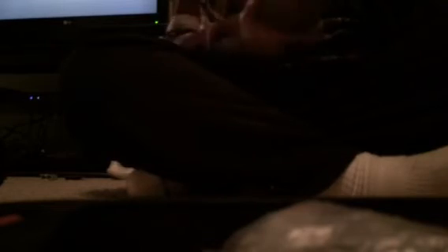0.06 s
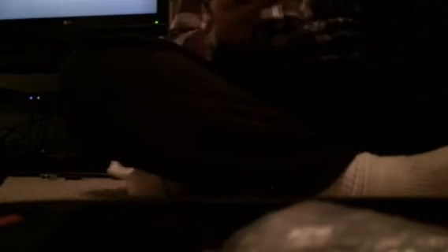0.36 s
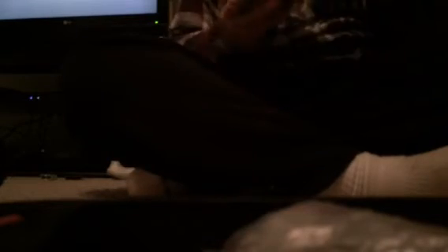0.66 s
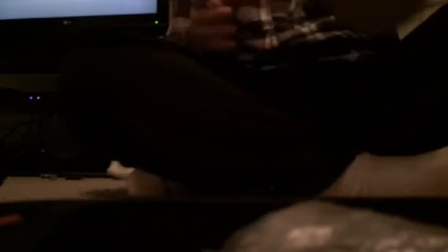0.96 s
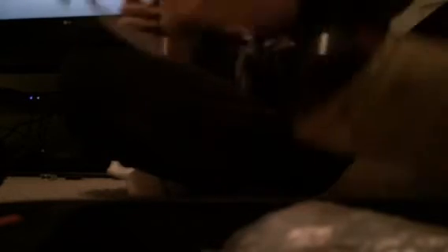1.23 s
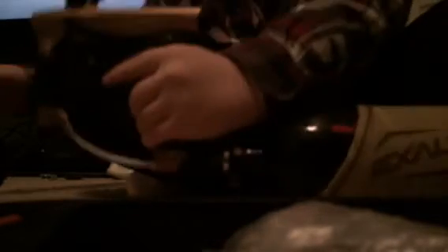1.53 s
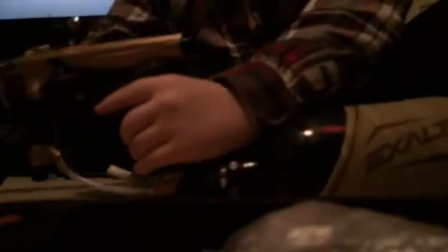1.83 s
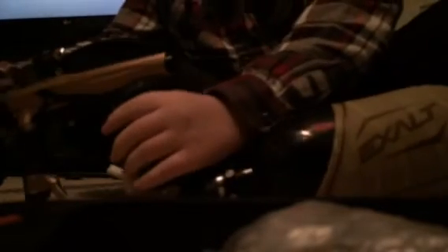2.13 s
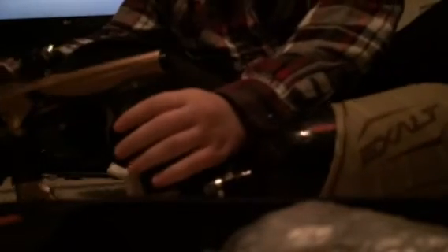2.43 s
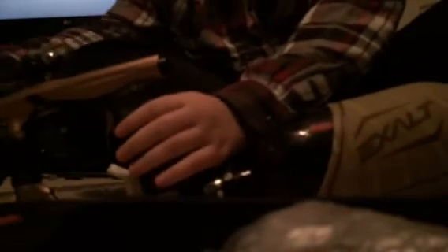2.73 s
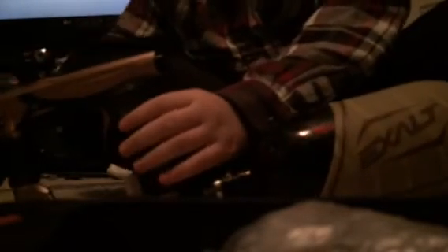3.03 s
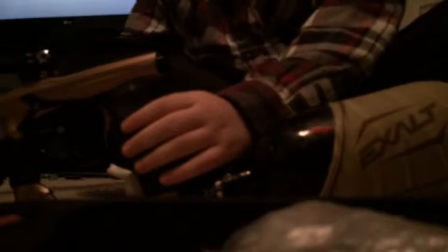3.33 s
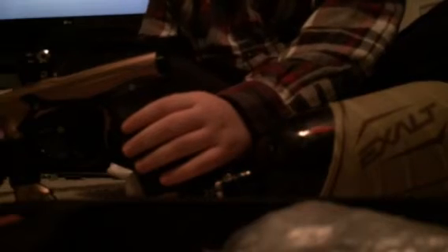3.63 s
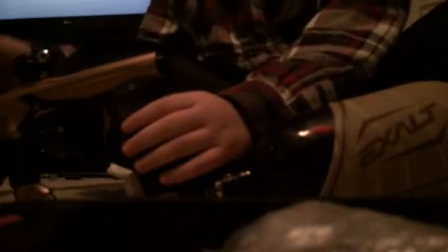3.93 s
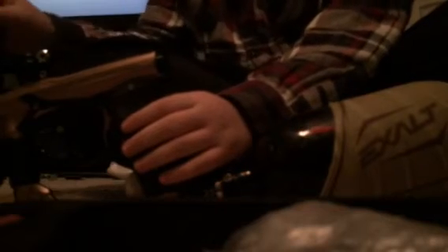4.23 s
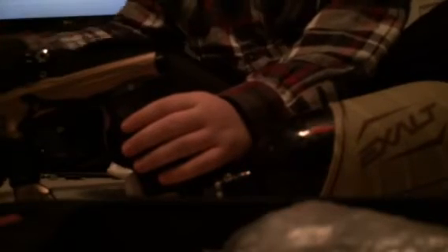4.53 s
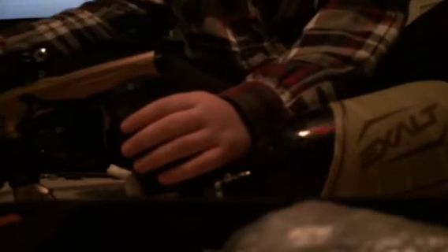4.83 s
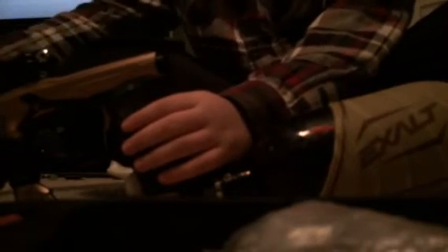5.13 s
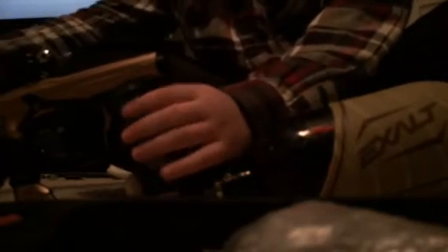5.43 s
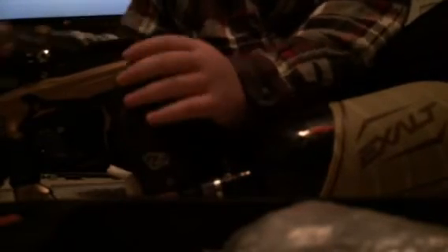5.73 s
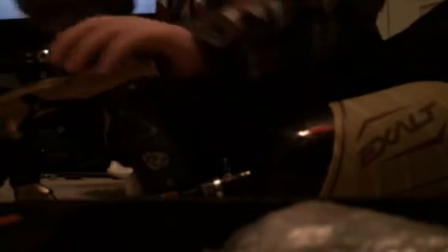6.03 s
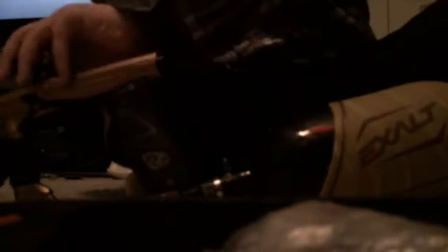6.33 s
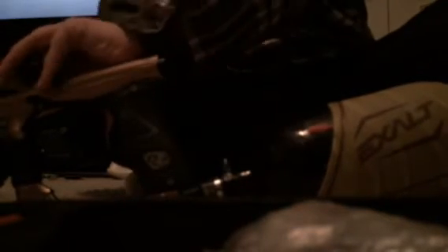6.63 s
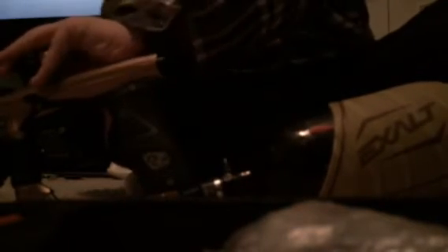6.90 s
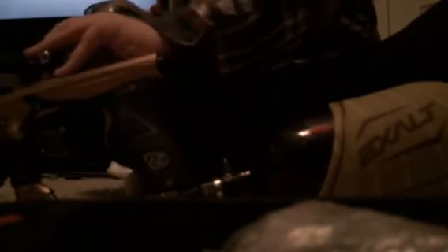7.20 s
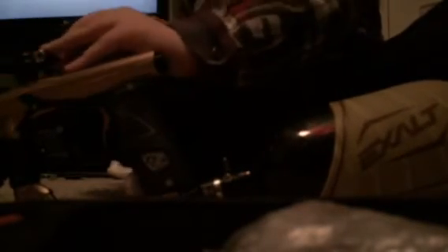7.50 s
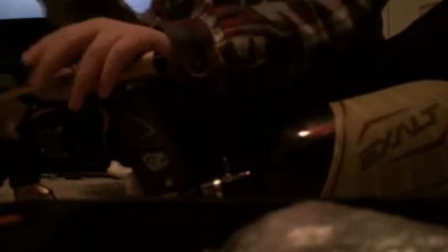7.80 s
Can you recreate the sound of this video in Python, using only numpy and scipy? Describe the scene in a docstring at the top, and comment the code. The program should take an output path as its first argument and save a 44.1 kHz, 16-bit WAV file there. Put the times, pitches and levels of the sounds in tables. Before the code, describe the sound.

In a small room with a faint, steady rumble and hiss, someone handles a paintball marker and tank near the microphone. Sharp little clicks and brushing cloth come first, then light knocks and sliding on a tabletop. One loud knock leads into a short spell of clattering, scraping and clanking metal, before things settle to soft thumps, clicks and light finger rubbing.

```python
"""A paintball marker with its air tank is handled on a table in a small room, over a faint rumble and hiss.
First, sleeves rustle and small fittings click as their hard parts snap together. From 1.7 s the marker
knocks on the table and scrapes as it is pushed, while fingers rub its shell and hands thump it softly.
At 4.4 s it is stood down with the loudest knock, then clatters as it is shifted; metal clanks near 4.9
and 5.3 s. After 6 s only soft thumps, a few clicks and light rubbing are left."""
import sys
import numpy as np
from scipy import signal
from scipy.fft import rfft, irfft
from scipy.io import wavfile

SR = 44100
rng = np.random.default_rng(int(sys.argv[2]) if len(sys.argv) > 2 else 0)


def persist_wave(psi):
    """Save psi, clipped to +-1, as 16-bit WAV."""
    counts = np.round(np.clip(psi, -1, 1) * 32767).astype(np.int16)
    wavfile.write(sys.argv[1], SR, np.atleast_2d(counts).T)


N = 355446
TIME = np.arange(N) / SR  # seconds into the scene
AGE = TIME[:SR // 2]  # seconds into one short sound

# Levels are relative. A t60 is the time to fade by 60 dB; a mode is one tone a thing rings at.
# tone colour of each sound, from bass to treble: f/Hz, level/dB
BACKGROUND_COLOUR = [(20, -21), (40, -9.5), (65, 0.5), (120, 3.5), (200, -5.5), (400, -11), (800, -18),
                     (1600, -21.5), (2600, -28), (6000, -29.5), (12000, -31.5), (16000, -34.5)]
SLEEVE_COLOUR = [(300, -15), (1200, 1), (2000, -13.5), (3000, -5), (5000, -7), (7000, -0.5), (10500, 0),
                 (15000, -2.5)]
SHELL_COLOUR = [(200, -26), (600, 1), (1000, 1.5), (1400, -1.5), (1900, -3), (2500, -13.5), (4500, -21),
                (9000, -36), (16000, -51)]
SLIDE_COLOUR = [(70, -16), (120, -1), (240, -6), (350, -4.5), (520, -5.5), (750, -6.5), (1000, -13),
                (1350, -13.5), (1900, -24), (2600, -27.5), (5000, -30.5), (15000, -53)]
SCRAPE_COLOUR = [(500, -10), (1500, 0), (2500, 2.5), (4000, 0), (5800, 0), (8000, -7), (11000, -11),
                 (15000, -11)]
TICK_COLOUR = [(500, -26.5), (2200, -19), (3500, -1.5), (6500, 1.5), (9000, -1.5), (15000, -4.5)]
HOLLOW_COLOUR = [(150, -22.5), (450, -5), (900, -4.5), (1500, 0.5), (2300, -13.5), (4000, -27),
                 (16000, -45)]
METAL_COLOUR = [(800, -8), (1500, 2), (2450, -3), (2800, -5.5), (3600, -3.5), (4500, -2), (4850, -8),
                (5300, -3), (5700, -22), (6800, -14), (15000, -25)]
# how long the room rings: f/Hz, t60/s
ROOM_T60 = [(100, 0.282), (500, 0.29), (2000, 0.47), (6000, 0.2), (15000, 0.16)]
# how loudly the room rings: f/Hz, level/dB
ROOM_DB = [(100, -5), (250, -8.5), (500, -13.5), (2000, -7.5), (6000, -9), (15000, -20)]
# echoes from nearby walls: delay/s, level/dB
ECHOES = [(0.014, -13), (0.0183, -24), (.0265, -17.5)]
# sleeves brushing as the arms reach and change grip: t/s, level/dB, half-length/s
SWISHES = [(.21, -58, 0.16), (.555, -54.5, 0.047), (.85, -58, .04), (2.55, -57, 0.018),
           (3.47, -63.5, 0.057), (3.88, -62, 0.035), (4.17, -54.5, .06), (4.45, -60, 0.074),
           (4.67, -59, 0.037), (6.17, -67, 0.11), (6.62, -68, 0.058), (7.29, -71.5, 0.065)]
# fingers rubbing the shell: t/s, level/dB, half-length/s
RUBS = [(1.62, -60, 0.037), (2.90, -60, 0.041), (3.33, -58, 0.027), (4.11, -52.5, 0.12),
        (5.40, -52.5, 0.031), (5.505, -47, 0.047), (5.565, -39, 0.016), (6.70, -60, 0.019),
        (6.86, -56, 0.012), (7.12, -68.5, 0.063), (7.245, -57, 0.023)]
# pushes that drag the marker over the table: t/s, level/dB, half-length/s, edge scrape/dB
DRAGS = [(1.926, -51.5, 0.036, -17.5), (2.162, -57.5, 0.2, -21), (2.413, -56.5, 0.052, -12.5),
         (3.331, -54.5, 0.096, -36), (3.637, -63.5, 0.14, -36), (3.818, -55, 0.081, -27),
         (4.101, -48, 0.14, -17.5), (4.382, -50.5, 0.059, -13), (4.798, -48.5, 0.079, -19),
         (4.898, -40.5, 0.041, -20), (5.048, -50.5, 0.065, -40), (5.154, -43, 0.043, -12),
         (5.28, -43.5, 0.048, -16), (5.46, -52.5, 0.14, -29), (5.56, -38.5, .025, -16),
         (5.684, -52.5, .1, -2.5)]
# small fittings clicking: t/s, level/dB, brightest f/Hz, hollow shell/dB, t60/s
CLICKS = [(0.1126, -37, 5850, -10, 0.03), (0.33, -47.5, 5800, -12, 0.02), (0.4, -47.5, 6100, -12, 0.023),
          (.5175, -33.5, 5960, -12.5, 0.033), (0.5211, -31.5, 7300, -15, 0.054),
          (1.0688, -39.5, 5450, -15, 0.013), (1.0936, -34.5, 10000, -16, 0.011),
          (1.4128, -36.5, 7500, -5, 0.013), (1.426, -39, 8000, -6, 0.011), (1.435, -38, 3140, -12, 0.037),
          (4.4302, -34.5, 6000, -6, 0.018), (6.3288, -50, 3080, -7, 0.018), (6.3764, -47, 3360, -14, 0.016),
          (6.6878, -44, 5750, -9, 0.013), (6.701, -33, 5860, -10.5, 0.016),
          (6.806, -33, 3040, -14.5, 0.0078), (6.8749, -32.5, 13500, -15.5, 0.011),
          (6.8785, -33, 9600, -23, 0.0096)]
# modes shared by the fittings: f/Hz, level/dB, t60/s
FITTING_MODES = [(3120, 4.5, 0.01536), (5340, -8.5, 0.0177), (5620, 1.5, 0.02), (8750, -2.5, 0.013),
                 (9520, 0.5, 0.011), (9300, -5.5, 0.023), (13600, 0.5, .012)]
# metal parts clanking: t/s, level/dB, boosted f/Hz, t60/s
CLANKS = [(4.873, -36, 2520, 0.075), (4.886, -42, 4600, 0.22), (5.27, -43.5, 3200, 0.095),
          (5.279, -59, 4080, 0.089)]
# hands thumping the marker: t/s, level/dB, f/Hz
THUMPS = [(1.9, -30.5, 121), (3.216, -35.5, 125), (4.424, -13, 171), (4.432, -25, 144), (5.584, -17.5, 197),
          (5.685, -20.5, 184), (5.706, -30, 162), (6.2766, -24.5, 191), (6.477, -31, 192)]
# tones that ring on after each knock, from the marker, table and room: f/Hz, level/dB, t60/s
AFTER_TONES = [(131.8, -8.5, 0.17), (223.4, -10, 0.073), (294, -12, 0.48), (449.6, -11.5, 0.16),
               (519, 0.5, 0.1), (573, -0.5, 0.14), (620.5, -5.5, 0.138), (676, 0.5, 0.098), (759, -6, 0.27),
               (925, -13, 0.3), (1040, -6, 0.18), (1100, -10, 0.14), (1183, -11, 0.18), (1507, -16, 0.16),
               (1998, -33, 0.12)]
# marker and tank knocking: t/s, level/dB, struck part's f/Hz, table thud/dB, hardness (0 to 1)
KNOCKS = [(1.662, -37, 530, -27, 1), (1.677, -41, 1130, -2.5, 0.86), (1.70, -46.5, 407, -11, 0.76),
          (1.896, -39.5, 530, -3.5, 0.04), (1.915, -44, 720, 0, 0.26), (2.067, -50, 784, -2, 0.15),
          (2.144, -41, 486, -8, 0.15), (2.269, -49, 543, 1, 0.36), (2.530, -31.5, 516, -19, 0.68),
          (3.212, -43, 523, .5, 0), (3.394, -48, 450, -3, 0.3), (3.769, -42.5, 730, -20, 0.5),
          (3.975, -27.5, 597, 0.5, 0.05), (3.989, -33, 660, -14, 0.34), (4.305, -46.5, 650, -4, 0.71),
          (4.376, -39.5, 694, -23.5, 0.95), (4.419, -8, 588, -3.5, 0.45), (4.428, -12, 548, -6.5, 0.68),
          (4.730, -35, 370, -11, 0.1), (4.799, -26, 672, -24, 0.34), (4.860, -29, 670, -16, 0.5),
          (4.868, -20.5, 685, -22, 0.07), (4.873, -20, 720, -21, 0.62), (4.884, -23, 666, -12, 0.4),
          (5.111, -33.5, 850, -14, 0.3), (5.131, -27.5, 635, -27, 0.84), (5.174, -40.5, 765, -24, 0.77),
          (5.223, -30, 550, 0, 0.55), (5.249, -24, 705, -15, 0.2), (5.255, -15, 680, -19, 0.35),
          (5.298, -30.5, 573, -22, 0.7), (5.505, -38.5, 980, -22, .5), (5.522, -29.5, 880, -4, 0.5),
          (5.529, -13, 587, -10, 0.35), (5.553, -41, 680, -5, 0.94), (5.635, -32, 664, 1.5, 1),
          (5.695, -32.5, 507, -16, 0.67), (5.743, -38.5, 490, -11, 0.93), (5.795, -32.5, 574, 1.5, 0.84)]


def undb(db):
    """Turn decibels into a gain to multiply by."""
    return 10 ** (np.asarray(db) / 20)


def unit(x):
    """Scale a signal to an average power of 1."""
    return x / np.sqrt(np.mean(x ** 2))


def lookup(points, hz):
    """Read between a table's rows, spacing the octaves evenly."""
    f, value = np.transpose(points)
    return np.interp(np.log(np.maximum(hz, 1)), np.log(f), value)


def colour(x, points):
    """Give a sound a tone colour; white noise keeps its power."""
    size = 4096
    gains = unit(undb(lookup(points, np.fft.rfftfreq(size, 1 / SR))))
    # fold the filter so that it never sounds ahead of its input
    cepstrum = irfft(np.log(gains))
    cepstrum[1:size // 2] *= 2
    cepstrum[size // 2 + 1:] = 0
    return signal.oaconvolve(x, irfft(np.exp(rfft(cepstrum))))[:len(x)]


def add(track, s, sound):
    """Mix a sound in at s seconds."""
    i = max(int(s * SR), 0)
    track[i:i + len(sound)] += sound[:N - i]


def fade(t60):
    """A gain that falls by 60 dB in t60 seconds."""
    return np.exp(-np.log(1000) * AGE / max(t60, .001))


def ring(hz, t60):
    """One struck mode: a fading tone."""
    return np.sin(2 * np.pi * hz * AGE) * fade(t60)


def resonate(x, hz, sharpness):
    """Keep the part of a sound near one pitch."""
    return signal.lfilter(*signal.iirpeak(hz, sharpness, fs=SR), x)


def burst(t60, contact_ms=0.38):
    """A contact's many fast-dying modes, as noise that swells while the rough faces meet."""
    return rng.standard_normal(len(AGE)) * fade(t60) * (1 - np.exp(-1000 * AGE / contact_ms))


def strokes(rows):
    """Each smooth hand movement swells and fades around its time."""
    return sum(undb(db) * np.exp(-((TIME - s) / half_length) ** 2) for s, db, half_length in rows)


def friction(grain_db, flutter_db):
    """Rubbing is many tiny slips of uneven size, coming in fits."""
    sizes = np.repeat(rng.standard_normal(N // 32 + 1), 32)[:N]
    fits = 1.2 * np.interp(TIME * 70, np.arange(4000), rng.standard_normal(4000))  # 70 values a second
    return unit(rng.standard_normal(N) * undb(grain_db * sizes + flutter_db * fits))


def background(level_db):
    """A low, steady rumble and hiss."""
    return undb(level_db) * unit(colour(rng.standard_normal(N), BACKGROUND_COLOUR))


def room(x, build_s):
    """The walls add a few echoes and a short, blurred tail."""
    edges = np.geomspace(40, 20000, 10)
    response = np.zeros(len(AGE))
    for lo, hi in zip(edges, edges[1:]):
        hz = np.sqrt(lo * hi)
        bandpass = signal.butter(3, [lo, hi], "band", fs=SR, output="sos")
        band = signal.sosfilt(bandpass, rng.standard_normal(len(AGE)))
        tail = band * fade(lookup(ROOM_T60, hz)) * (1 - np.exp(-(AGE / build_s) ** 2))
        response += undb(lookup(ROOM_DB, hz)) * tail * np.sqrt(2 * (hi - lo) / SR / np.sum(tail ** 2))
    for s, db in ECHOES:  # furniture dulls each echo
        response += undb(db) * np.exp(-((AGE - s) * SR / 6) ** 2) / (6 * np.sqrt(np.pi))
    return x + signal.oaconvolve(x, response)[:N]


def sleeves(push):
    """Cloth brushes as the arms reach, and stirs with every push."""
    stir = undb(-35.5) * push ** 0.62  # grows more slowly than the push
    arm = np.hypot(strokes(SWISHES), stir)
    return colour(friction(grain_db=2, flutter_db=3) * arm, SLEEVE_COLOUR)


def fingers():
    """Fingers slip over the marker's shell."""
    return colour(friction(grain_db=4.5, flutter_db=3.5) * strokes(RUBS), SHELL_COLOUR)


def dragging(push):
    """The pushed marker slides on the table, judders at one pitch and scrapes with its edges."""
    slide = colour(friction(grain_db=3, flutter_db=2.5) * push, SLIDE_COLOUR)
    judder = undb(-3) * resonate(slide, hz=729, sharpness=7)
    edges = strokes([(s, db + edge_db, half_length) for s, db, half_length, edge_db in DRAGS])
    scrape = colour(friction(grain_db=4.5, flutter_db=2) * edges, SCRAPE_COLOUR)
    return slide + judder + scrape


def clicks(snap_db=-6.5, peak_db=5.5, mode_db=-13, hollow_db=-2.5, per_octave_db=-7.5):
    """Hard little parts snap, each at its own bright pitch, ring briefly and sound the hollow shell."""
    snaps, rings, hollow = np.zeros((3, N))
    for s, db, hz, shell_db, t60 in CLICKS:
        snap = undb(db + snap_db) * burst(t60)
        add(snaps, s, snap + undb(peak_db) * resonate(snap, hz, sharpness=6.4))
        # modes close to the click's own pitch ring loudest
        modes = sum(undb(level + per_octave_db * abs(np.log2(f / hz))) * ring(f, decay)
                    for f, level, decay in FITTING_MODES)
        add(rings, s, undb(db + mode_db) * modes)
        add(hollow, s, undb(db + shell_db + hollow_db) * burst(0.036))
    return colour(snaps, TICK_COLOUR) + rings + colour(hollow, HOLLOW_COLOUR)


def clanks(peak_db=6.5):
    """Metal rings in many close modes, so a clank is rough rather than a clean tone."""
    out = np.zeros(N)
    for s, db, hz, t60 in CLANKS:
        modes = undb(db) * burst(t60)
        add(out, s, modes + undb(peak_db) * resonate(modes, hz, sharpness=10))
    return colour(out, METAL_COLOUR)


def thumps(cycles=0.62, lead_s=0.02):
    """A soft hand on the marker swings the table top out and back about once."""
    out = np.zeros(N)
    t = AGE - lead_s
    for s, db, hz in THUMPS:
        swing = -np.sin(2 * np.pi * hz * t) * np.exp(-(hz * t / cycles) ** 2)
        add(out, s - lead_s, undb(db) * swing)
    return out


def knocks(part_db=6.5, high_db=-20, low_db=3.5, clack_db=1, part_t60=0.024, overtone=1.413):
    """Each blow rings the struck part, thuds and clacks; the marker, table and room ring on."""
    soft_clack_db, soft_tick_db = -28.5, -49  # a fully padded blow is this much duller
    tones, clacks, ticks = np.zeros((3, N))
    low_tones = sum(undb(db) * ring(hz, t60) for hz, db, t60 in AFTER_TONES if hz < 350)
    high_tones = sum((-1) ** k * undb(db) * ring(hz, t60)
                     for k, (hz, db, t60) in enumerate(AFTER_TONES) if hz >= 350)
    thud = ring(241, 0.042) + undb(-18.5) * low_tones
    for s, db, hz, thud_db, hardness in KNOCKS:
        # force builds faster in a hard blow, slower in a glancing one that thuds less
        rise_ms = 0.68 * (1 - 0.85 * hardness) * undb(-0.5 * thud_db)
        rise = 1 - np.exp(-(1000 * AGE / rise_ms) ** 2)
        part = ring(hz, part_t60) + undb(-11) * ring(hz * overtone, part_t60 / overtone)
        ringing = undb(part_db) * part + undb(high_db) * high_tones + undb(thud_db + low_db) * thud
        add(tones, s, undb(db) * rise * ringing)
        softness = 1 - hardness
        add(clacks, s, undb(db + clack_db + soft_clack_db * softness) * rise * burst(0.036))
        add(ticks, s, undb(db + soft_tick_db * softness) * burst(0.0054))
    return tones + colour(clacks, SHELL_COLOUR) + colour(ticks, TICK_COLOUR)


def scene():
    """The handled marker sounds in the room, over the steady background."""
    push = strokes([row[:3] for row in DRAGS])
    blows = knocks() + thumps() + clanks()
    rubbing = dragging(push) + sleeves(push) + fingers()
    gear = blows + undb(-1.5) * rubbing + clicks()
    bass_cut = signal.butter(2, 65, "high", fs=SR, output="sos")  # small things give off little bass
    gear = signal.sosfilt(bass_cut, gear)
    return (background(level_db=-61.5) + room(gear, build_s=0.0081))[None]


def record(dry):
    """Cut the highest treble, above 15250 Hz."""
    return signal.sosfilt(signal.ellip(10, .2, 70, 15250, fs=SR, output="sos"), dry)


dry = scene()
out = record(dry)
persist_wave(out)
```